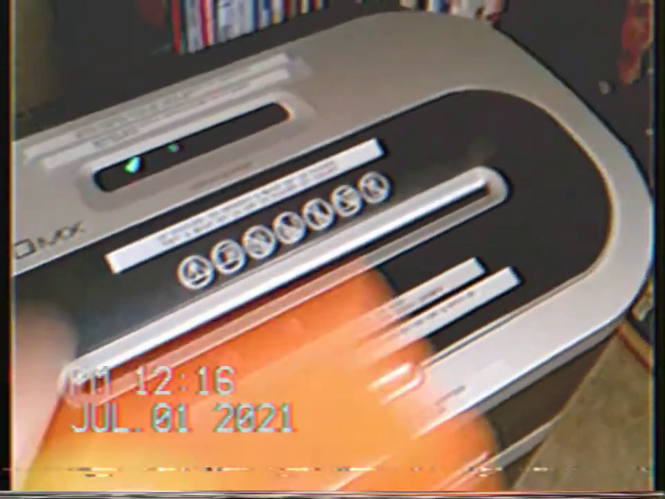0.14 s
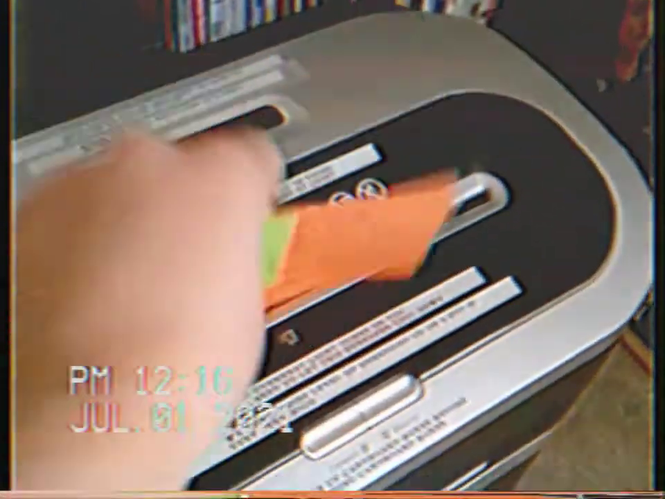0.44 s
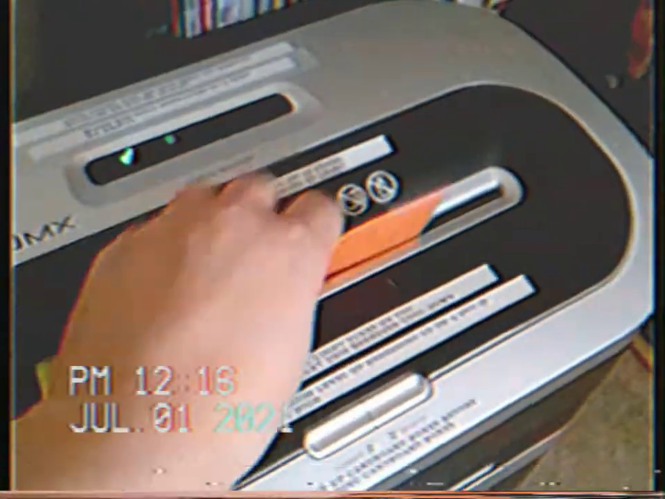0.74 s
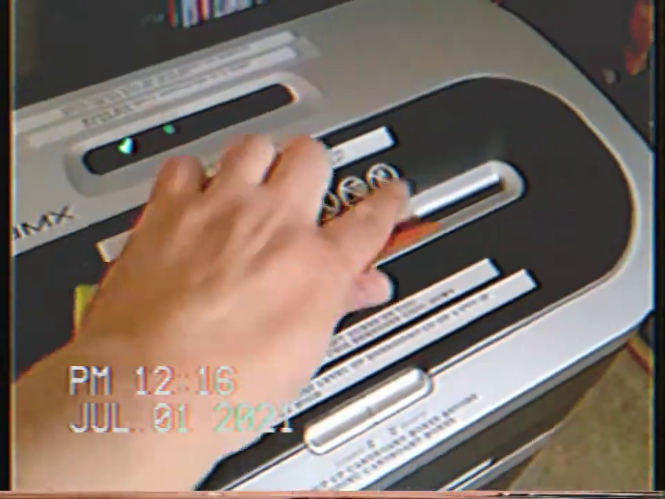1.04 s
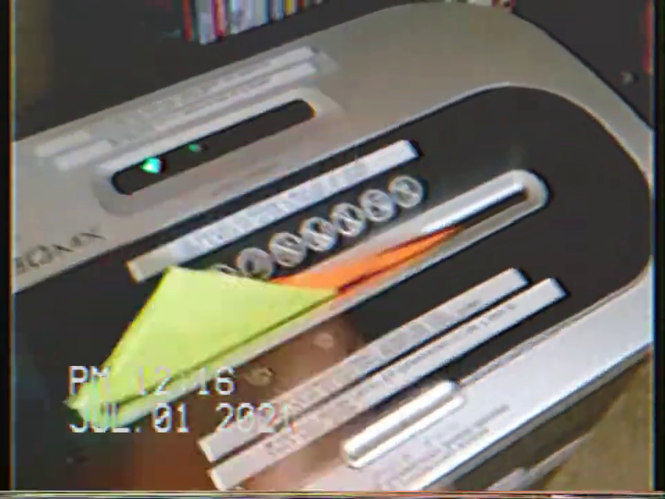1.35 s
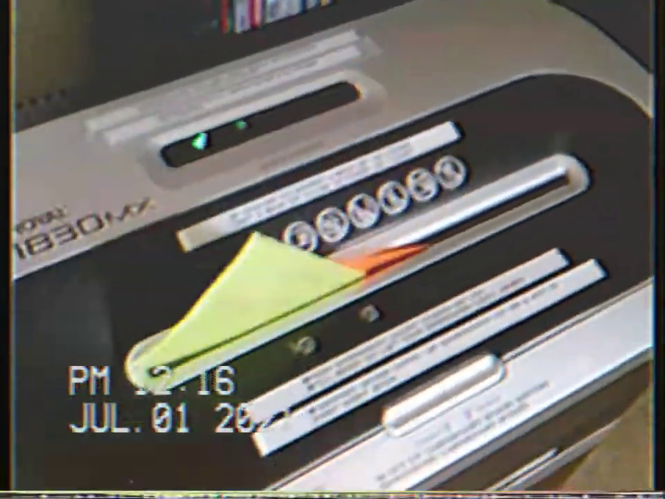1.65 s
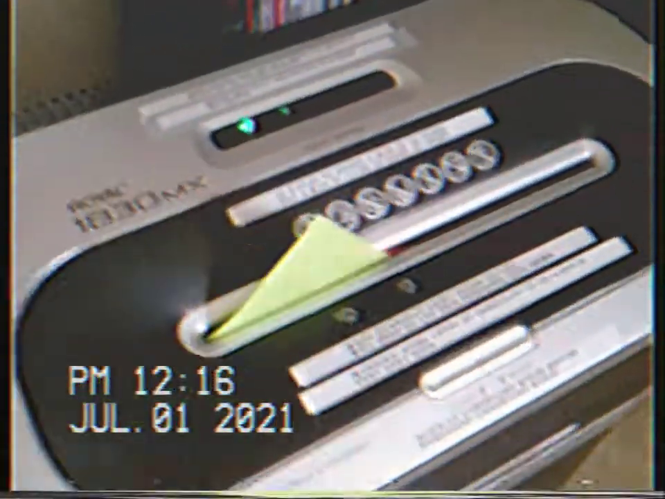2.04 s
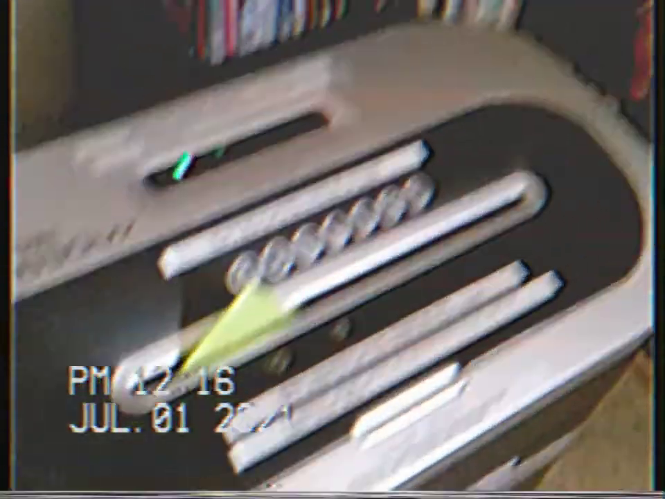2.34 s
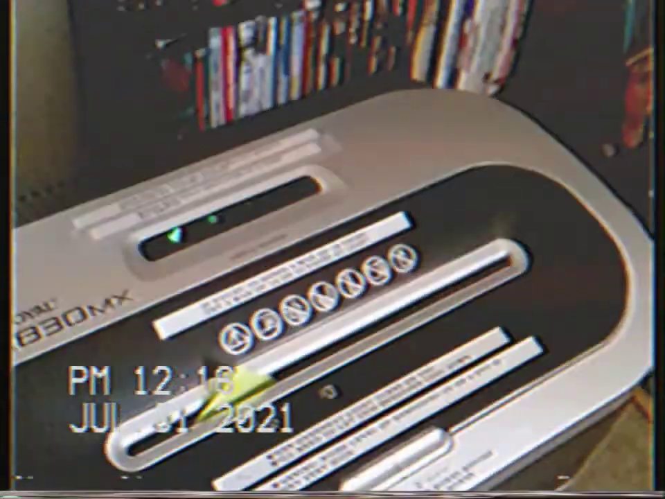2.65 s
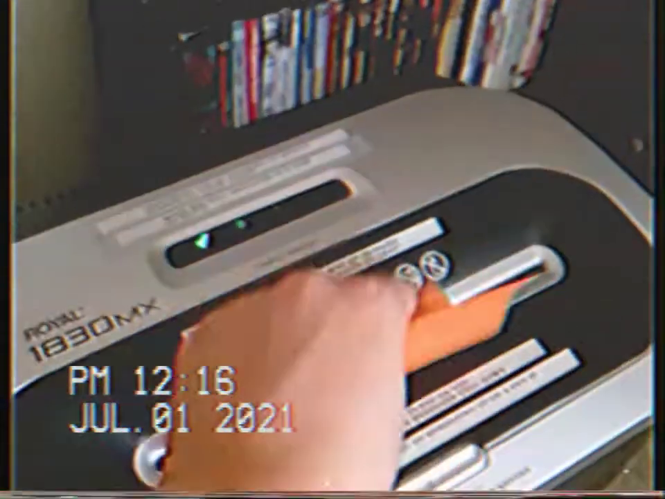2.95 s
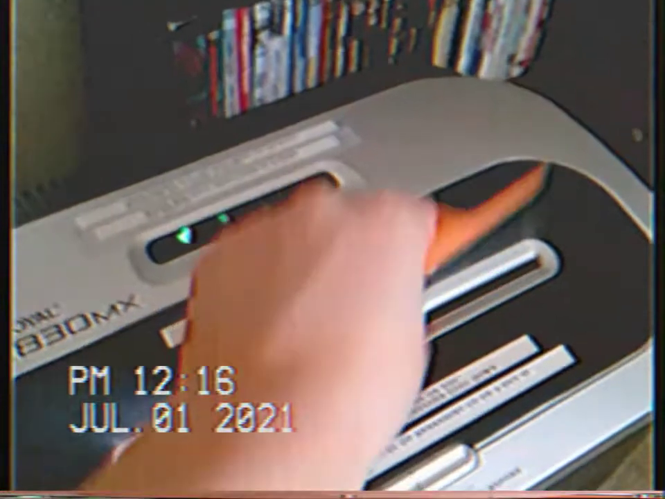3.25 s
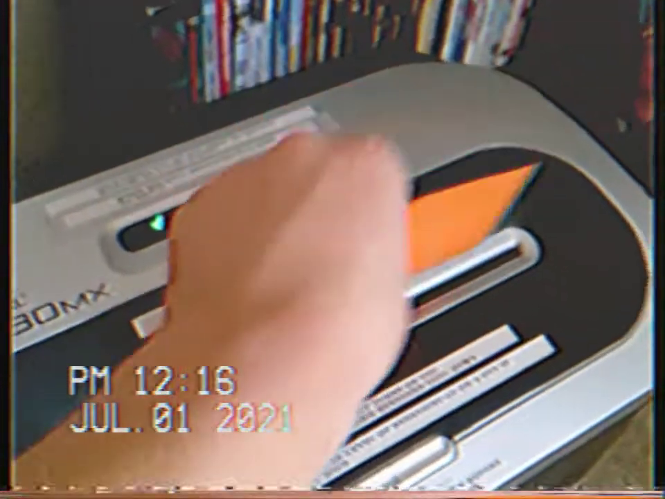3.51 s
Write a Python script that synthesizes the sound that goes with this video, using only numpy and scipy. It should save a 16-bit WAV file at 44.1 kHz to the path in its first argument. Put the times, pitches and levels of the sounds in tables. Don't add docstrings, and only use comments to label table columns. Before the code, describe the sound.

A paper shredder hums and chatters as folded sheets crackle and tear through its cutters indoors.

```python
import sys
import numpy as np
from scipy import signal
from scipy.fft import rfft, irfft, next_fast_len
from scipy.io import wavfile
from scipy.ndimage import map_coordinates

SR = 44100
rng = np.random.default_rng(int(sys.argv[2]) if len(sys.argv) > 2 else 0)


def store_pcm(level_fs):
    pcm = np.round(np.clip(level_fs, -1, 1) * 32767).astype(np.int16)
    wavfile.write(sys.argv[1], SR, np.atleast_2d(pcm).T)


def invert_db(level):
    return 10 ** (np.asarray(level, dtype=float) / 20)


N = 162288

# time_s, gear chatter_db, paper hiss_db
CUTTING_LOAD = [(0, -46.5, -104), (.6, -45, -79), (.95, -42.5, -68.5), (1.3, -41, -67), (1.85, -43, -75.5),
                (2.5, -41, -62), (2.95, -42, -65.5), (3.25, -41.5, -63), (3.68, -44.5, -73)]


def unit(x):
    return x / np.sqrt(np.mean(x ** 2) + 1e-20)


def along(points, hz):
    point_hz, value = np.transpose(points)
    return np.interp(np.log(hz + 1), np.log(point_hz + 1), value)


def seconds():
    return np.arange(N) / SR


def curves(rows):
    s, *columns = np.transpose(rows)
    return [np.interp(seconds(), s, column) for column in columns]


def wobble(rate):
    return map_coordinates(rng.standard_normal(400), [seconds() * rate])


def filtered(x, response):
    m = next_fast_len(N + SR // 2)
    return irfft(rfft(x, m) * response(np.fft.rfftfreq(m, 1 / SR)), m)[:N]


def resonances(rows, f):
    total = 0
    for k, (centre, width, db) in enumerate(rows):
        damping = 1j * f * width
        total = total + (-1) ** k * invert_db(db) * damping / (centre ** 2 - f ** 2 + damping)
    return total


def ticks(per_s, spread_db):
    chance, side, size = rng.random((3, N))
    impulses = (chance < per_s / SR) * np.sign(side - 0.5)
    return unit(impulses * invert_db(-spread_db * np.log(size + 0.03)))


def sine(hz, level_db):
    cycles = np.cumsum(hz) / SR + rng.random()
    return np.sqrt(2) * invert_db(level_db) * np.sin(2 * np.pi * cycles)


def band(x, low_hz, high_hz):
    edges_hz = [low_hz, min(high_hz, SR / 2.2)]
    return signal.sosfilt(signal.butter(2, edges_hz, "band", fs=SR, output="sos"), x)


def place(out, start, sound):
    out[start:][:len(sound)] += sound


def air():
    # freq_hz, density_db (per Hz)
    air_colour = [(1500, -17), (3000, 0.5), (8000, -6.5), (10600, -4), (11500, -9), (16000, -15)]
    noise = rng.standard_normal(N)
    return invert_db(-65) * unit(filtered(noise, lambda f: invert_db(along(air_colour, f)) * (f > 1000)))


def motor():
    # time_s, mesh_hz, tone_db
    mesh_track = [(0.0, 221.5, -44), (0.01, 222.1, -50), (0.38, 223.4, -43.5), (0.57, 223.7, -53),
                  (1.07, 225.5, -44), (1.62, 223.8, -40.5), (2.97, 222.2, -51), (3.34, 222.8, -42.5),
                  (3.6, 223.0, -49.5), (3.68, 226.3, -48)]
    # pitch_hz, rms_db, wander_db
    machine_tones = [(77.6, -63, 2), (119.7, -51.5, 2.5), (172.7, -69, -2), (473.4, -66.5, 7),
                     (832, -73, 6), (1070, -67, 3)]
    # time_s, tone_db
    stage_track = [(0.0, -53), (0.55, -57), (1.2, -45), (2.39, -49.5), (2.78, -46), (3.65, -49.5),
                   (3.68, -77)]
    # pitch_hz, rms_db, start_s, end_s
    whines = [
        (2870, -70.5, 1.03, 1.92),
        (395, -57, 1.52, 3.7),
        (2430, -72.5, .9, 2),
    ]
    # pitch_hz, rms_db, t60_s
    bin_ring = (140, -41.5, 1)
    t = seconds()

    mesh_hz, mesh_db = curves(mesh_track)
    out = sine(mesh_hz + 2.34 * wobble(19), mesh_db + 1.37 * wobble(17))

    load_db = curves(CUTTING_LOAD)[0]
    strain_db = 0.97 * (load_db - load_db.mean())
    for hz, db, wander_db in machine_tones:
        out += sine(hz * (1 + 0.001913 * wobble(8)), db + strain_db + wander_db * wobble(7.4))

    rough = filtered(rng.standard_normal(N), lambda f: resonances([(309.4, 17, 0)], f) ** 2)
    stage = 0.61 * unit(rough) + 0.58 * sine(np.full(N, 317), 0)
    out += invert_db(curves(stage_track)[0] + 1.5) * stage

    fade_s = 0.081
    for hz, db, start, end in whines:
        fade = np.clip(np.minimum(t - start, end - t) / fade_s, 0, 1)
        out += sine(hz * (1 + 0.00495 * wobble(40.08)), db + 2.0 * wobble(9.52)) * fade

    hz, db, t60 = bin_ring
    return out + sine(np.full(N, hz), db - 60 * t / t60)


def gears():
    # centre_hz, width_hz, peak_db
    casing_modes = [(79, 48.7, -1.5), (134.7, 20.4, 2), (208, 37, 1), (283.7, 18.3, 4.5),
                    (328.6, 105, -3.5), (435.7, 12.2, 1.5), (467.3, 25.5, 0), (545, 46.6, -1),
                    (614, 49, -1), (698, 39.3, -2), (778, 58, -8), (1009, 39, -8), (1086, 25, -6.5),
                    (1266, 95, -8.5)]
    modes = casing_modes + [(1660, 350, -19)]
    chatter_share = 0.48
    push = chatter_share * ticks(900, 4) + (1 - chatter_share) * rng.standard_normal(N)
    push = push * invert_db(1.35 * wobble(14))

    def body(f):
        low_cut = (1j * f / (55 + 1j * f)) ** 3
        return resonances(modes, f) * low_cut / (1 + 1j * f / 2000)

    return unit(filtered(push, body)) * invert_db(curves(CUTTING_LOAD)[0] + 0.5)


def drags():
    # start_s, level_db, t60_s
    slides = [
        (.35, -56, 0.17),
        (1.87, -53.5, .4),
        (2.101, -58, 0.43),
        (3.6, -57.5, 0.34),
        (2.745, -51, 0.23),
        (2.78, -50.5, 0.3),
        (3.306, -50.5, 0.16),
        (3.353, -38.5, 0.27),
    ]
    t = seconds()
    loudness = 0
    for s, db, t60 in slides:
        loudness = loudness + invert_db(db - 60 * (t - s).clip(0) / t60) * (t > s)
    grain = rng.standard_normal(N) + 0.73 * ticks(670, 3.5)
    return loudness * unit(filtered(grain, lambda f: resonances([(2050, 2700, 0)], f) ** 2))


def knocks():
    # start_s, peak_db, ring_hz
    contacts = [(0.25, -34, 1100), (0.74, -34, 1073), (.914, -33, 740), (1.72, -31.5, 870),
                (2.848, -27.5, 310), (.849, -33, 1390), (.57, -33, 1560), (2.106, -40, 1560),
                (1.482, -41, 1500), (2.1, -36, 1900), (1.7, -34, 5200), (.5697, -44, 4200),
                (3.3506, -17, 2260), (3.3529, -18, 2120), (3.351, -25.5, 1430), (1.104, -35, 630),
                (1.167, -29.5, 630), (1.335, -29, 678)]
    decay_cycles = 13
    out, t = np.zeros(N + SR), np.arange(SR // 4) / SR
    for s, db, hz in contacts:
        soft_onset = 1 - np.exp(-t * hz / 1.15)
        decay = invert_db(db - 30 * t * hz / decay_cycles)
        place(out, round(s * SR), decay * np.sin(2 * np.pi * hz * t) * soft_onset)
    return out[:N]


def flaps():
    # start_s, peak_db, burst t60_s
    slaps = [
        (2.727, -30, 0.044),
        (2.73, -20.5, 0.035),
        (2.74, -30.5, 0.027),
        (3.317, -31, 0.096),
        (3.3505, -9, 0.0073),
        (3.353, -13.5, 0.0091),
        (3.362, -26, 0.0086),
    ]
    # centre_hz, width_hz, peak_db
    sheet_modes = [(586, 360, 1.5), (1120, 430, -0.5), (1515, 140, 0.5), (2200, 460, -1), (2920, 750, -4.5),
                   (3670, 330, -2), (4670, 1100, -10.5), (8950, 7000, -20)]
    out, t = np.zeros(N + SR), np.arange(SR // 8) / SR
    for s, db, t60 in slaps:
        burst = 0.42 * rng.standard_normal(len(t)) * invert_db(-60 * t / t60)
        burst[:3] += 1.5
        place(out, round(s * SR), invert_db(db + 6.0) * burst)
    return filtered(out[:N], lambda f: resonances(sheet_modes, f) / (1 + 1j * f / 9000) ** 2)


def creases():
    count, pitch_hz, decay_cycles = 220, 3000, 9
    cut_db = curves(CUTTING_LOAD)[1]
    out, t = np.zeros(N + SR), np.arange(SR // 100) / SR
    for when, pitch, size in rng.random((count, 3)):
        start, hz = int(when * N), pitch_hz * 2.5 ** (pitch - 0.4)
        shake = np.cumsum(0.5 * rng.standard_normal(len(t)))
        peak_db = cut_db[start] + 3 + 16.3 * size ** 2
        tick = invert_db(peak_db - 30 * t * hz / decay_cycles) * np.sin(2 * np.pi * hz * t + shake)
        place(out, start, tick)
    return out[:N]


def snaps():
    # start_s, peak_db, ring_hz
    crease_snaps = [(0.0505, -45, 2550), (0.2344, -51, 3400), (0.2616, -43, 2840), (0.275, -43, 2850),
                    (0.569, -37.5, 2860), (0.734, -52.5, 2920), (0.85, -40.5, 2810), (0.9114, -38.5, 2100),
                    (1.042, -45, 2870), (1.2994, -44, 2370), (1.3359, -38.5, 3940), (1.3824, -48, 3030),
                    (1.482, -34, 2160), (1.5668, -41.5, 2460), (1.6475, -33, 2620), (1.6626, -41, 3340),
                    (1.709, -44, 2520), (1.8743, -36, 2740), (1.8884, -44, 3200), (1.9614, -37, 2750),
                    (1.9794, -37, 2580), (2.014, -44, 3100), (2.0669, -37, 2730), (2.0954, -46, 2740),
                    (2.1065, -36, 2370), (2.129, -39.5, 3140), (2.173, -42.5, 2460), (2.2019, -37, 2160),
                    (2.2633, -44, 2160), (2.3474, -37, 3380), (2.3672, -42, 3110), (2.376, -36, 2980),
                    (2.4266, -42.5, 3190), (2.5522, -45, 2460), (2.593, -39.5, 2750), (2.615, -37, 2130),
                    (2.615, -35, 3446), (2.6459, -40, 2530), (2.6633, -44, 2660), (2.701, -50, 2850),
                    (2.8479, -41, 2160), (2.8775, -44.5, 2530), (2.9314, -49, 2920), (3.007, -46.5, 2770),
                    (3.0553, -43, 2870), (3.1198, -36, 2480), (3.174, -45, 2380), (3.252, -46, 2160),
                    (3.4462, -34, 2470), (3.563, -50, 2220), (3.624, -49, 2110)]
    # start_s, peak_db, centre_hz
    fibre_cracks = [(0.0498, -65, 10400), (0.237, -47, 9530), (0.2613, -54, 9840), (0.2723, -48, 9190),
                    (0.5702, -36.5, 9700), (0.6599, -54, 10500), (0.839, -51, 9720), (0.846, -41, 9490),
                    (0.9107, -41, 10700), (0.9467, -45, 12300), (0.9931, -44, 11650), (1.0407, -48, 9360),
                    (1.189, -48, 10300), (1.258, -44, 9630), (1.296, -36.5, 9050), (1.333, -38.5, 10200),
                    (1.36, -47, 10700), (1.3722, -43, 9740), (1.48, -33, 10200), (1.566, -40.5, 10300),
                    (1.6472, -33, 10100), (1.6851, -48, 9470), (1.8652, -46, 9640), (1.8733, -43, 9850),
                    (1.9616, -42, 11400), (1.98, -40, 10000), (2.0497, -45, 9700), (2.1063, -32.5, 9900),
                    (2.1979, -45, 10400), (2.3474, -31, 11400), (2.3742, -31, 11300), (2.4264, -36.5, 7670),
                    (2.6123, -34, 10200), (2.7317, -41, 9070), (2.7776, -45, 9550), (2.876, -40, 9780),
                    (3.0075, -49, 9550), (3.056, -44, 9220), (3.1205, -33.5, 10800), (3.1747, -39, 11500),
                    (3.3123, -46, 9980), (3.3489, -33, 9500), (3.3872, -45, 9570), (3.4464, -35.5, 10100),
                    (3.6264, -47, 10700)]
    out, t = np.zeros(N + SR), np.arange(SR // 8) / SR
    rise = 1 - np.exp(-t / 0.0006)

    snap_shape = rise * (invert_db(-60 * t / 0.0079) + invert_db(-10 - 60 * t / 0.064))
    for s, db, hz in crease_snaps:
        noise, shake = rng.standard_normal((2, len(t)))
        ring = 0.56 * np.sin(2 * np.pi * hz * t + np.cumsum(0.11 * shake)) * invert_db(-60 * t / 0.028)
        rustle = 1.36 * band(noise * snap_shape, hz * 0.67, hz * 1.78)
        place(out, round(s * SR), invert_db(db + 1.5) * (rise * ring + rustle))

    crack_shape = rise * (invert_db(-60 * t / 0.0062) + invert_db(-13 - 60 * t / 0.044))
    for s, db, hz in fibre_cracks:
        noise = rng.standard_normal(len(t))
        crack = band(noise * crack_shape, hz / 1.38, hz * 1.38)
        place(out, round(s * SR), invert_db(db + 3.0) * crack)
    return out[:N]


def shreds(colour):
    hiss = rng.standard_normal(N) * invert_db(0.75 * wobble(25.55))
    crackle = ticks(550, 6.5) * invert_db(-15 + 4 * wobble(40.43))
    return unit(filtered(hiss + crackle, lambda f: invert_db(along(colour, f))))


def cutters():
    # freq_hz, density_db (per Hz)
    paper_colour = [(1200, -9), (1600, 7.5), (2200, 1.5), (2900, 2.5), (4500, -3), (6500, -23),
                    (9000, -10.5), (16000, -16)]
    # freq_hz, density_db (per Hz)
    fizz_colour = [(5000, -8), (8000, -10), (9800, 2.5), (12000, -3), (13500, -8), (16000, -8.5)]
    # centre_s, half_length_s, rise_db
    fold_swells = [(0.258, 0.041, 26), (0.667, 0.011, 14), (.78, .035, 10.5), (1.597, .04, 8.5),
                   (0.861, 0.034, 15), (0.975, 0.035, 9.5), (1.387, 0.03, 8), (1.709, 0.023, 10.5),
                   (1.83, 0.13, 17.5), (1.99, 0.058, 12), (2.204, 0.052, 9.5), (2.647, 0.019, 8),
                   (2.819, 0.038, 9), (3.18, 0.017, -5)]
    t = seconds()
    fizz_db = curves(CUTTING_LOAD)[1] - 2.5
    for s, half, rise_db in fold_swells:
        fizz_db = fizz_db + rise_db * np.exp(-((t - s) / half) ** 2)
    mean_db = fizz_db.mean()
    tear_db = mean_db + 3.5 + 0.87 * (fizz_db - mean_db)
    return shreds(paper_colour) * invert_db(tear_db) + shreds(fizz_colour) * invert_db(fizz_db)


def room(x):
    # freq_hz, t60_s
    room_decay = [(300, 0.77), (2000, 0.44), (6000, 0.13), (14000, 0.37)]
    hz, t, z = signal.stft(rng.standard_normal(SR // 2), SR, nperseg=256)
    decay = invert_db(-60 * t / along(room_decay, hz)[:, None])
    tail = signal.istft(z * decay, SR, nperseg=256)[1]
    delayed = np.pad(x, (200, 0))
    return signal.fftconvolve(delayed, tail / np.linalg.norm(tail))[:N]


def scene():
    machine = air() + motor() + gears()
    paper, sheet = snaps() + knocks(), flaps()
    wet = invert_db(-6) * room(paper) + invert_db(-11) * room(sheet)
    mix = machine + drags() + creases() + cutters() + paper + sheet + wet
    return mix[None]


def low_pass(x):
    return signal.sosfilt(signal.butter(12, 16500, fs=SR, output="sos"), x)


def record(dry):
    mix = filtered(dry[0], lambda f: np.where(f < 15750, 1, invert_db(-38) * (f < 16500)))[None]
    return low_pass(mix)


dry = scene()
out = record(dry)
store_pcm(out)
```